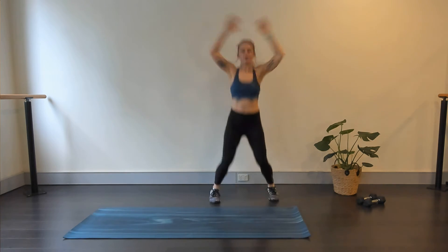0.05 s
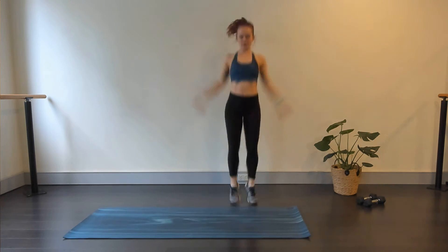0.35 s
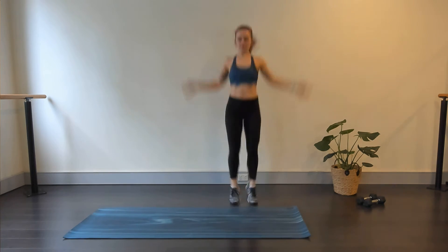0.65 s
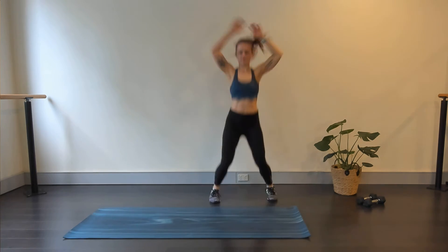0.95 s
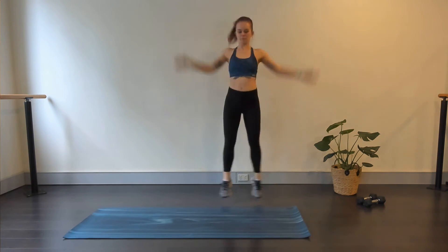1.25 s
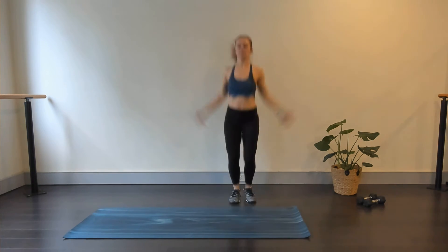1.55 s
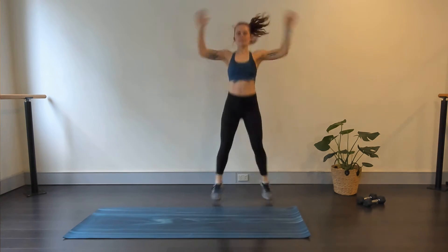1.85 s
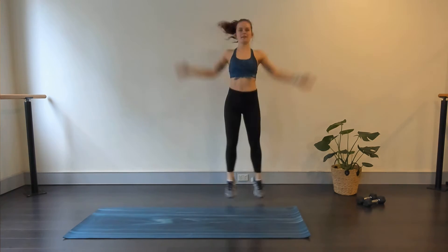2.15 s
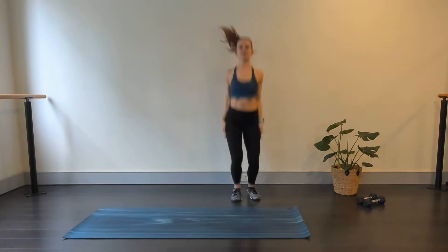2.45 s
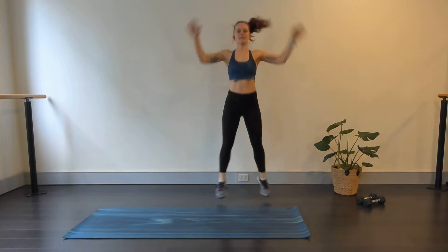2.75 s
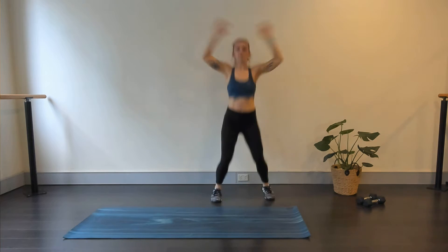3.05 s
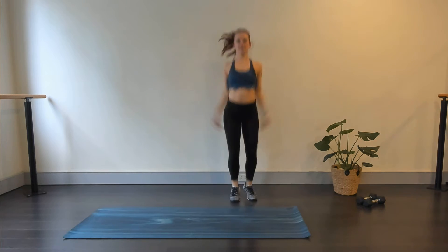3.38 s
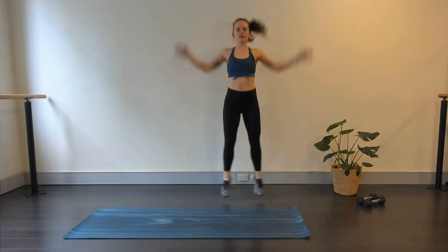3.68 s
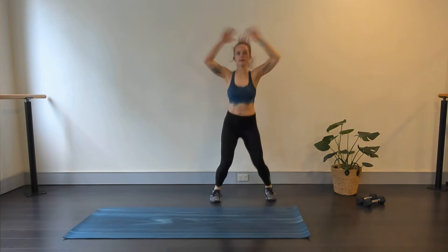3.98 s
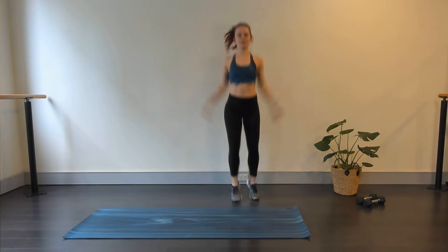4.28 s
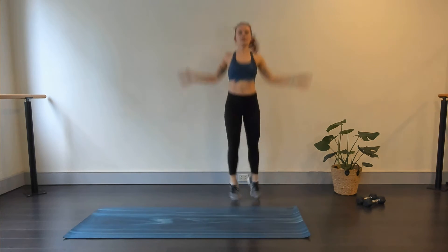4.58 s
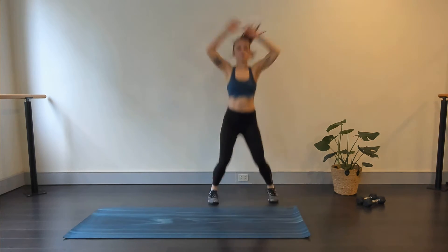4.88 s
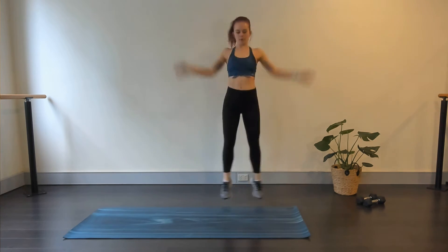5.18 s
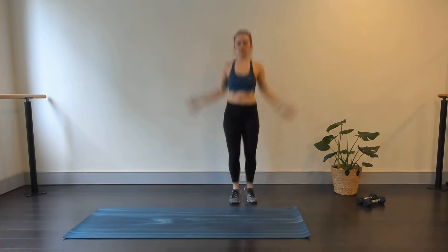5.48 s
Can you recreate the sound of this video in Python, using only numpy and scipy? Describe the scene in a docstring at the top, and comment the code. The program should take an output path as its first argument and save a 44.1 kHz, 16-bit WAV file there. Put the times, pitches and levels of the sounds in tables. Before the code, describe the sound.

Soft shoes land on a wooden floor in a bare studio, doing jumping jacks from the very start. Twelve landings come about half a second apart, the last near 5.4 seconds. Each is a quick roll of toe, ball and heel: hollow board knocks, a rubbery slap, a light tick and a low boom. The tone alternates as the feet land apart and together. The landings at the start, 2.5 and 5 seconds are strongest; those near 3.5 and 4.5 are softer. The shoes clap together at about 2.6 seconds, followed by a short falling squeak. Fainter claps and tiny high squeaks are scattered between other landings, and a board groans briefly near 1.6 and 5.6 seconds. Faint ventilation runs underneath. The microphone is distant, and the room's ring is cut short as the sound dips between landings.

```python
"""A bare studio with a wooden floor: someone does jumping jacks in soft shoes, two landings a second.
The feet land apart and together in turn. Each landing is a quick run of touches that knock the boards,
slap the soles, tick the tread and boom the joists (the beams under the floor), and the room rings on.
Now and then the shoes clap together or squeak, or a board groans. Faint ventilation runs behind it all.
A distant microphone with a noise suppressor cuts the echoes short."""
import sys
import numpy as np
from scipy import signal
from scipy.fft import rfft, irfft
from scipy.io import wavfile
from scipy.ndimage import uniform_filter1d, minimum_filter1d

SR = 44100
rng = np.random.default_rng(int(sys.argv[2]) if len(sys.argv) > 2 else 0)


def unload_audio(sound):
    """Save the sound as a 16-bit wav file, at the path given as the first command line argument."""
    columns = np.transpose(np.atleast_2d(sound))
    # keep every value between -1 and 1, then stretch to whole-number steps
    steps = np.round(np.clip(columns, -1, 1) * 32767)
    wavfile.write(sys.argv[1], SR, steps.astype(np.int16))


N = 248238
RING = 32768  # samples in which one blow dies away
LEVEL_S = .1  # the level of a blow is counted over this time
SUPPRESS_DB = 11.5  # how far the suppressor turns quiet moments down

# landings: t/s, toe level/dB, ball level/dB, sinking weight level/dB, heel level/dB,
# gap between the first touches/s, heel delay/s, extra tick/dB, extra boom/dB
JUMPS = [ (.025, -43.5, -38, -35.5, -45.5, 0.015, .088, 4, -4),
         (.523, -45, -46.5, -46, -41, 0.011, 0.086, -2, 0.5),
         (1.035, -45, -41.5, -57.5, -47, .007, .078, 1, -0.5),
         (1.521, -43, -45, -53, -52, 0.0069, 0.07, 0.5, 3.5),
         (2.019, -53, -47.5, -54, -50.5, 0.013, 0.089, 2, -2),
         (2.485, -42.5, -43.5, -42.5, -37.5, .014, 0.096, -0.5, -1),
         (2.996, -50, -46, -57, -46.5, .011, 0.087, 0, -3.5),
         (3.482, -49, -53.5, -52.5, -57.5, .012, .075, -2, -1.5),
         (3.970, -51, -44.5, -57, -42, .014, .085, -1.5, 0),
         (4.473, -51, -47.5, -56, -60, .011, .057, 1, 4),
         (4.960, -37.5, -40, -40, -48.5, 0.0071, .115, -1, -1),
         (5.430, -42, -40, -50.5, -45.5, 0.007, 0.082, -1, 1)]
# knee bend and push-off, feet apart then together: sink delay/s, push delay/s, push against ball level/dB
KNEE_BENDS = [(.043, .140, -8.5), (.050, .115, -19.5)]
# the mix for each named part of a landing: knock/dB, slap/dB, tick/dB, boom/dB
TOUCH_MIX = {"toe": (0.5, -7, -9.5, -9.5), "first ball": (-1.5, -9, -15.5, -14),
             "second ball": (0.5, -15.5, -21.5, -9.5), "sink": (0, -12, -25.5, -5),
             "heel": (-1, -9.5, -21, -7), "push-off": (1.5, -16.5, -18, -17)}
# notes at which the boards ring: f/Hz, width/Hz, gain with feet apart/dB, gain with feet together/dB
BOARD_NOTES = [(106.4, 13, 5.5, 10.5), (164, 19, 5.5, 6.5), (216, 22.5, 6.5, 13), (300.6, 31, 13.5, 3),
               (395, 6.1, 9.5, 1.5), (510.3, 35, 4.5, 6), (556.6, 14, 0, 7.5), (644, 49, 8.5, 6.5),
               (782, 15, 8.5, 6), (946, 67, 2, 1), (1190, 5.5, -4, -12.5), (1279, 9.2, 7, -1.5),
               (1434, 24, 4, -8.5), (1850, 99, 1.5, -2.5)]
# notes at which the joists swing: f/Hz, time to fade by 60 dB/s, relative level/dB
JOIST_NOTES = [(32.3, 0.28, -1), (40.9, 0.49, 9), (80.5, 0.37, 5.5), (113.5, 0.58, 0.5)]
# tone colours of the board knock, the sole slap and the tread tick: f/Hz, relative level/dB
KNOCK_COLOUR = [(40, -13.5), (100, -6.5), (170, -1), (300, -1.5), (600, -3), (850, -11.5), (1300, -13),
                (3000, -56)]
SLAP_COLOUR = [(300, -42), (700, 3), (1100, 8), (1600, 1.5), (2300, -5), (3200, -5.5), (6000, -55)]
TICK_COLOUR = [(800, -25), (2200, -20), (3200, 4), (5000, 2.5), (6300, -2.5), (7400, -8.5), (8300, -25),
               (9000, -39)]
# the shoes clap or graze each other as the feet close: t/s, level/dB
SHOE_CLAPS = [(.601, -57), (2.588, -41.5), (4.514, -56.5), (5.521, -63)]
# notes at which the soles ring: f/Hz, width/Hz, gain/dB
SOLE_NOTES = [(600, 300, 8), (1220, 410, 8.5), (1680, 190, 8), (2540, 180, 1), (2960, 130, -2)]
# rubber squeaks and low board groans: t/s, length/s, f/Hz, width/Hz, glide as a share of f, level/dB
RUBS = [(0.25, 0.029, 6840, 320, -0.044, -60.5), (0.762, 0.084, 6500, 1000, -0.027, -64),
        (1.255, 0.08, 6520, 410, -0.075, -60), (1.635, 0.056, 547, 9, -0.012, -46.5),
        (2.627, 0.19, 1844, 120, -0.11, -52), (3.218, 0.1, 6700, 2000, 0.014, -76),
        (3.466, 0.054, 5000, 730, -0.11, -59), (4.203, 0.063, 6800, 790, 0, -72.5),
        (5.174, 0.04, 6660, 1800, -0.018, -67.5), (5.557, 0.045, 538, 4.9, 0.021, -47.5)]
# tone colour of the moving air: f/Hz, relative level/dB
AIR_COLOUR = [(12, -36.5), (20, -8), (44, -6), (108, -11.5), (158, -10), (284, -20), (314, -15.5),
              (438, -18), (565, -21), (1040, -22), (1490, -26), (2480, -29.5), (2740, -31.5), (5750, -40),
              (8870, -59), (11500, -77.5), (19500, -120)]
# fan tones, as heard with the suppressor turned down: f/Hz, level/dB
FAN_TONES = [(43.1, -76), (279.9, -85.5), (829.0, -95.5), (963.6, -91), (1141, -88.5), (2573, -84)]


def landings():
    """The toes skim in and land, the balls of the feet follow, weight sinks, heels touch, feet push off."""
    out = np.zeros(N)
    knock = [make_filter(colour(KNOCK_COLOUR, RING) * boards(stance)) for stance in range(2)]
    slap = [make_filter(colour(SLAP_COLOUR, RING) * boards(stance)) for stance in range(2)]
    tick = make_filter(colour(TICK_COLOUR, RING))
    for i, jump in enumerate(JUMPS):
        start_s, toe_db, ball_db, sink_db, heel_db, roll_s, heel_s, tread_db, boom_db = jump
        stance = i % 2  # 0 is feet apart, 1 is feet together
        sink_s, push_s, push_db = KNEE_BENDS[stance]
        touches = [("toe", 0, toe_db), ("first ball", roll_s, ball_db),
                   ("second ball", 2 * roll_s, ball_db), ("sink", sink_s, sink_db),
                   ("heel", heel_s, heel_db), ("push-off", push_s, ball_db + push_db)]
        for part, delay_s, strength_db in touches:
            levels = strength_db + np.array(TOUCH_MIX[part]) + [0, 0, tread_db, boom_db]
            brief = part in ("toe", "first ball")
            add(out, start_s + delay_s, sole_touch(knock[stance], slap[stance], tick, *levels, brief))
        brush = skim(swell_s=0.009)
        brush_filter = undb(-2) * knock[stance] + undb(-3) * slap[stance] + undb(tread_db - 11.5) * tick
        add(out, start_s - len(brush) / SR, undb(toe_db) * irfft(rfft(brush, RING) * brush_filter))
    return out


def sole_touch(knock, slap, tick, knock_db, slap_db, tick_db, boom_db, brief):
    """One touch of a sole knocks the boards, slaps the rubber, ticks the tread and booms the joists."""
    noise = rng.standard_normal((3, RING))
    grip = unit(undb(3.8 * np.repeat(rng.standard_normal(RING // 64), 64)))  # the tread grips in tiny steps
    # the harder the touch, the more of it comes as one crisp click
    hardness_db = min(tick_db + 52, 6)
    click = undb((-3 if brief else -7) + 0.22 * hardness_db) * tread_snap(depth_db=3)
    tap_s = 0.011 if brief else 0.015
    blow = undb(knock_db) * knock * echoes(noise[0], undb(-10.5), 0.013, room_db=2.5, fade_s=0.42)
    blow += undb(slap_db) * slap * echoes(noise[1] * grip, undb(-20.5), 0.0091, room_db=0, fade_s=0.77)
    blow += undb(tick_db) * tick * echoes(noise[2] * grip, click, tap_s, room_db=2, fade_s=0.63)
    return irfft(blow) + undb(boom_db) * joists(rise_s=0.0031)


def boards(stance):
    """The boards boost their own notes; where the feet land decides which ones stand out."""
    hz = np.fft.rfftfreq(RING, 1 / SR)
    power = sum(undb(db[stance]) ** 2 / (1 + (2 * (hz - note_hz) / width) ** 2)
                for note_hz, width, *db in BOARD_NOTES)
    return np.sqrt(1 + power)


def joists(rise_s):
    """The body's weight sinks into the floor and sets the beams swinging with a low boom."""
    t = np.arange(RING) / SR
    swing = np.zeros(RING)
    for hz, fade_s, db in JOIST_NOTES:
        hz *= 1 + 0.054 * rng.standard_normal()
        swing += undb(db) * fade(t, fade_s) * np.sin(2 * np.pi * hz * t)
    return swing * (1 - np.exp(-t / rise_s))


def tread_snap(depth_db):
    """Air pockets in the tread close differently every time and give each click its own short ring."""
    ripple = signal.resample(rng.standard_normal(80), RING // 2 + 1)
    return make_filter(undb(depth_db * ripple))


def skim(swell_s):
    """The sole brushes the floor, growing louder until it grips."""
    t = np.arange(RING // 16) / SR
    return rng.standard_normal(len(t)) * np.exp((t - t[-1]) / swell_s)


def shoe_claps():
    """The edges of the two soles meet with a hollow clack, hard or barely touching."""
    out = np.zeros(N)
    soften = signal.butter(3, 3900, fs=SR, output="sos")  # soft rubber has little treble
    for start_s, clap_db in SHOE_CLAPS:
        blow = irfft(echoes(rng.standard_normal(RING), undb(-10), .012, room_db=-6, fade_s=.42))
        ring = sum(undb(db) * resonate(blow, hz, width) for hz, width, db in SOLE_NOTES)
        clack = unit(signal.sosfilt(soften, ring))
        add(out, start_s, undb(clap_db) * clack * np.sqrt(LEVEL_S * SR / RING))
    return out


def squeaks():
    """Rubber slips on the floor or a board rubs its neighbour: a shaky tone that may slide as it fades."""
    out = np.zeros(N)
    for start_s, length_s, hz, width, glide, db in RUBS:
        progress = np.linspace(0, 1, int(length_s * SR))
        # uneven slips roughen the tone
        slips = np.sqrt(2 * np.pi * width / SR) * rng.standard_normal(RING)[:len(progress)]
        phase = np.cumsum(2 * np.pi * hz * (1 + glide * progress) / SR + slips)
        tone = unit(resonate(np.sin(phase), hz, hz / 4))
        rise_and_fall = undb(3.5) * np.minimum(progress / 0.12, 1) * np.sqrt(1 - progress)
        add(out, start_s, undb(db) * tone * rise_and_fall)
    return out


def echoes(noise, direct, shudder_s, room_db, fade_s):
    """The spectrum of a blow as it arrives: the direct pulse, a shudder of shoe and floor, then the room."""
    t = np.arange(RING) / SR
    shudder = unit(np.exp(-t / shudder_s))
    room = unit((1 - np.exp(-t / 0.0016)) * fade(t, fade_s))
    paths = rfft(noise * np.hypot(shudder, undb(room_db) * room))
    # the many paths blur the blow in time but keep its overall tone colour
    paths *= make_filter(uniform_filter1d(abs(paths) ** 2, size=110) ** -.5)
    return unit(direct + unit(paths)) * np.sqrt(LEVEL_S * SR)


def ventilation():
    """Soft steady air with a few faint, wavering fan tones."""
    t = np.arange(N) / SR
    air = unit(irfft(rfft(rng.standard_normal(N)) * colour(AIR_COLOUR, N), N))
    drifts = np.cumsum(rng.standard_normal((len(FAN_TONES), N)), axis=1) / np.sqrt(SR)
    tones = sum(undb(db) * np.sqrt(2) * np.sin(2 * np.pi * hz * t + 5 * drift)
                for (hz, db), drift in zip(FAN_TONES, drifts))
    return undb(SUPPRESS_DB) * (undb(-65) * air + tones)


def undb(db):
    """Turn decibels into a number to multiply by."""
    return 10 ** (np.asarray(db) / 20)


def unit(x):
    """Scale to an average power of 1."""
    return x / np.sqrt(np.mean(abs(x) ** 2))


def fade(t, fade_s):
    """A curve that falls by 60 dB every fade_s seconds."""
    return np.exp(-np.log(1000) * t / fade_s)


def colour(points, size):
    """Join (f/Hz, level/dB) points into a gain for every frequency."""
    hz, db = np.transpose(points)
    return undb(np.interp(np.log(np.fft.rfftfreq(size, 1 / SR) + 1), np.log(hz), db))


def make_filter(gain):
    """The spectrum of the quickest filter with this tone colour, scaled to an energy of 1."""
    cepstrum = irfft(np.log(unit(gain) + 1e-6))
    # move all the ringing to after the hit
    cepstrum[1:RING // 2] *= 2
    cepstrum[RING // 2 + 1:] = 0
    return np.exp(rfft(cepstrum))


def resonate(x, hz, width):
    """Let through a band of frequencies around one note."""
    return signal.lfilter(*signal.iirpeak(hz, hz / width, fs=SR), x)


def add(out, start_s, sound):
    """Mix a sound in at its start time."""
    i = int(start_s * SR)
    part = sound[max(-i, 0):N - i]
    out[max(i, 0):max(i, 0) + len(part)] += part


def scene():
    """Landings, shoe noises and room air at one microphone."""
    return (landings() + shoe_claps() + squeaks() + ventilation())[None]


def suppressor(x, open_db, follow, hold_s):
    """Stays open briefly after a sound, then turns down; loud blows raise the level needed to open it."""
    power = uniform_filter1d(x ** 2, size=1000).clip(0)
    level_db = 10 * np.log10(power + 1e-18)
    hold = int(hold_s * SR)
    held_db = -minimum_filter1d(-level_db, hold, origin=(hold - 1) // 2)  # highest recent level
    peak_db = -minimum_filter1d(-level_db, size=22000)  # highest within a quarter second either way
    threshold_db = open_db + follow * np.maximum(peak_db - open_db, 0)
    opening = uniform_filter1d(.5 + .5 * np.tanh((held_db - threshold_db) / 3), size=600)
    return x * undb(-SUPPRESS_DB * (1 - opening))


def record(dry):
    """The microphone turns quiet moments down and steeply cuts the treble above 8700 Hz."""
    quieted = suppressor(dry, open_db=-50, follow=0.54, hold_s=0.026)
    return signal.sosfilt(signal.ellip(8, .2, 70, 8700, fs=SR, output="sos"), quieted)


dry = scene()
out = record(dry)
unload_audio(out)
```